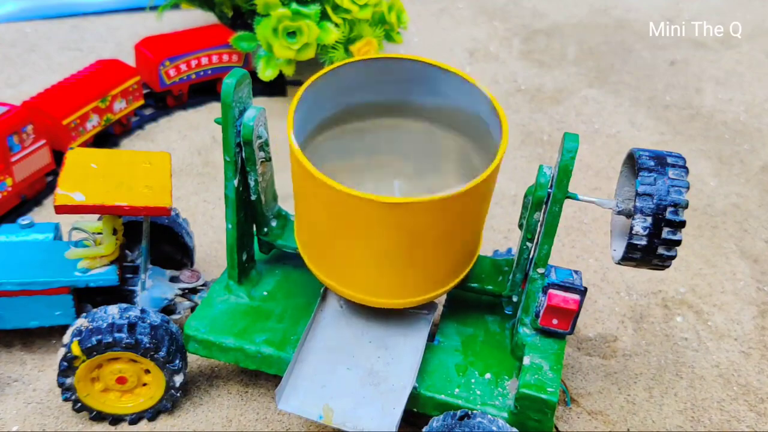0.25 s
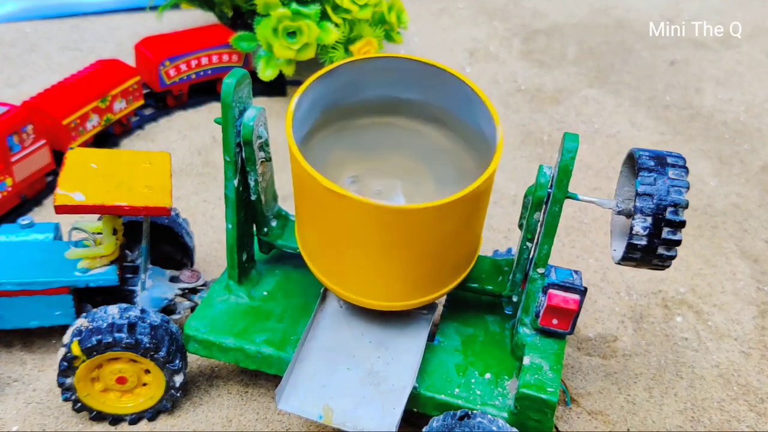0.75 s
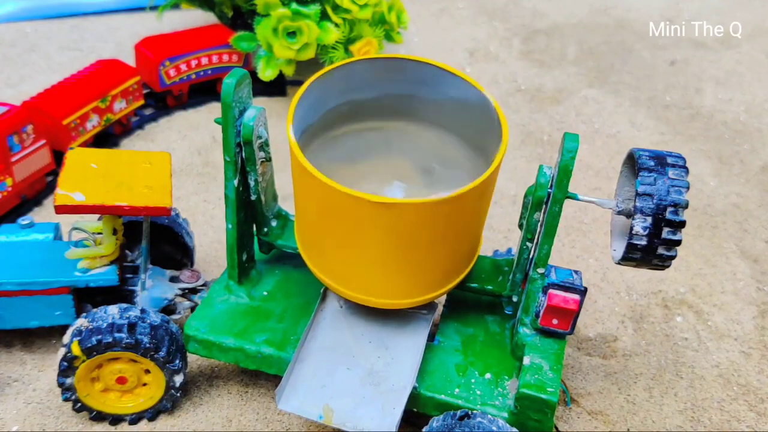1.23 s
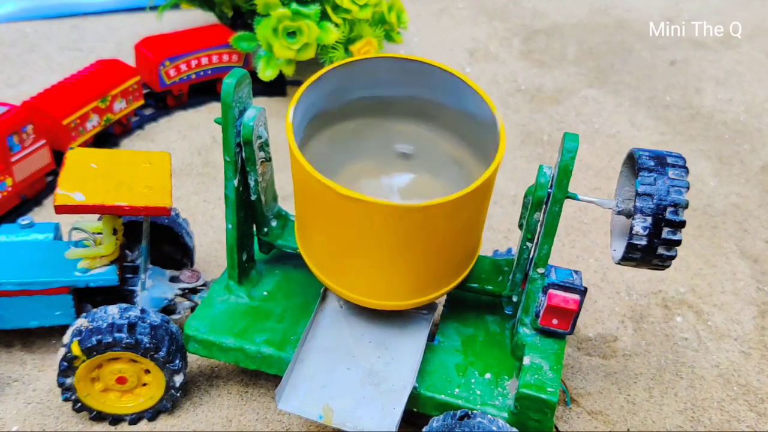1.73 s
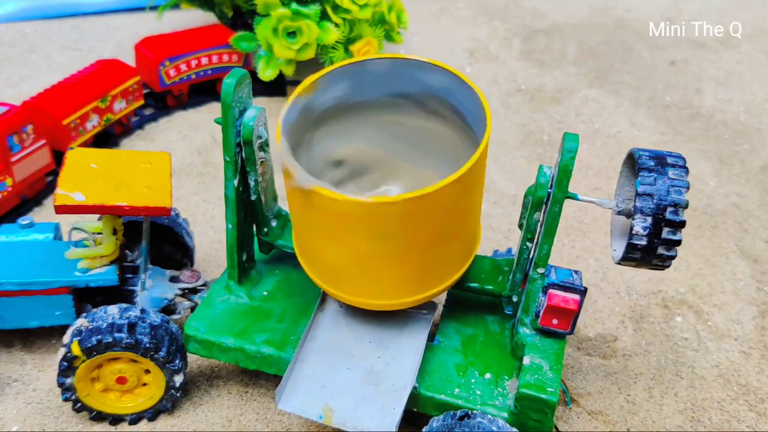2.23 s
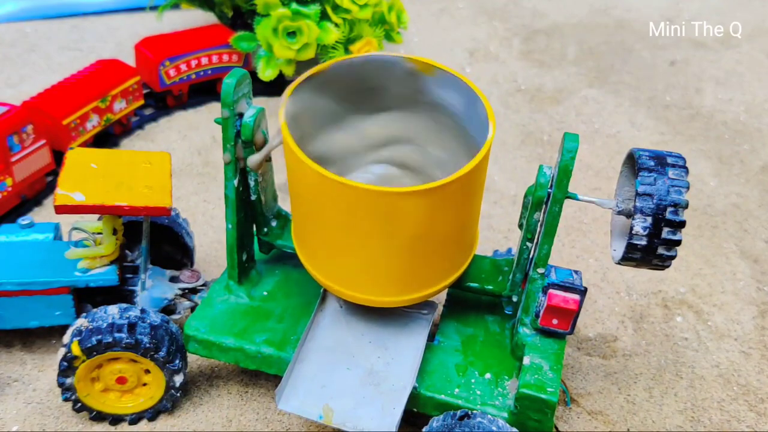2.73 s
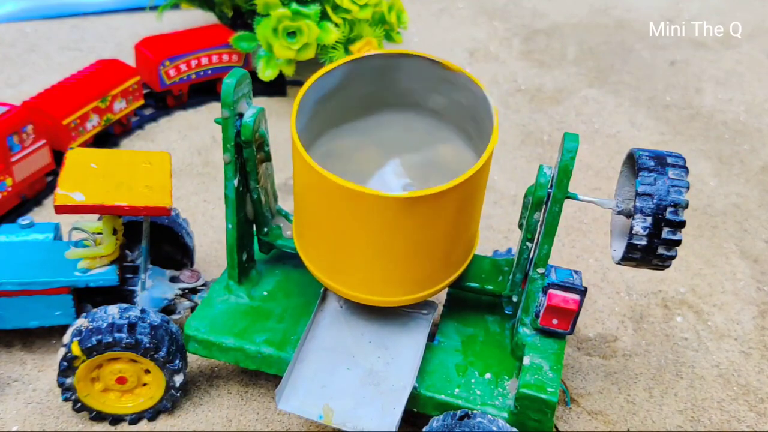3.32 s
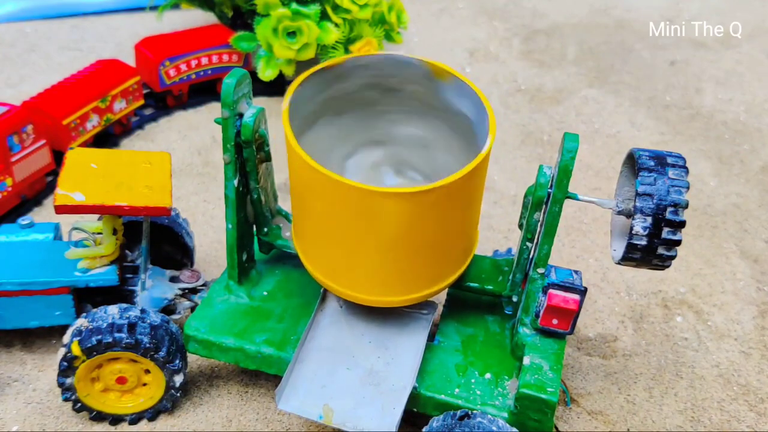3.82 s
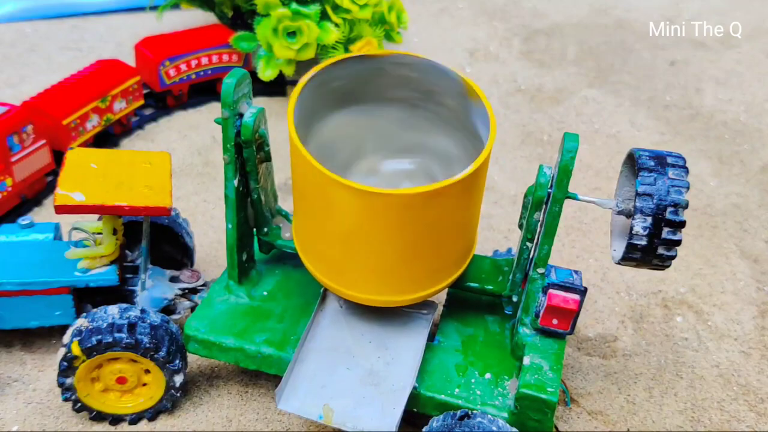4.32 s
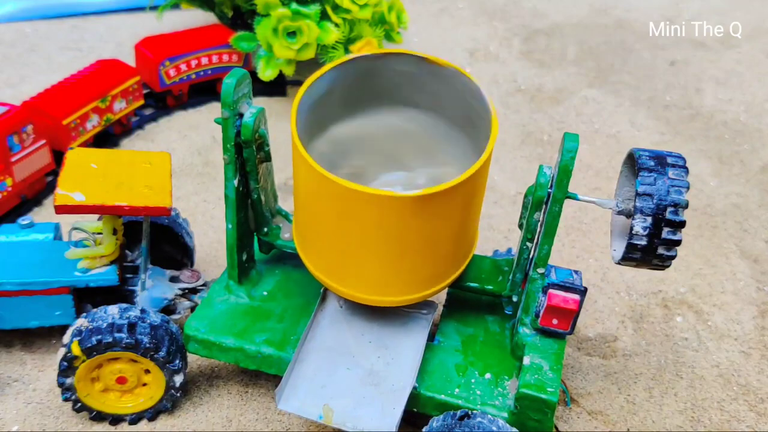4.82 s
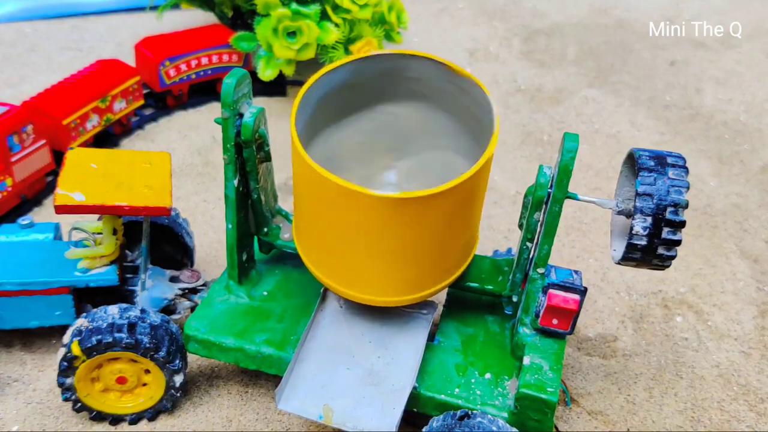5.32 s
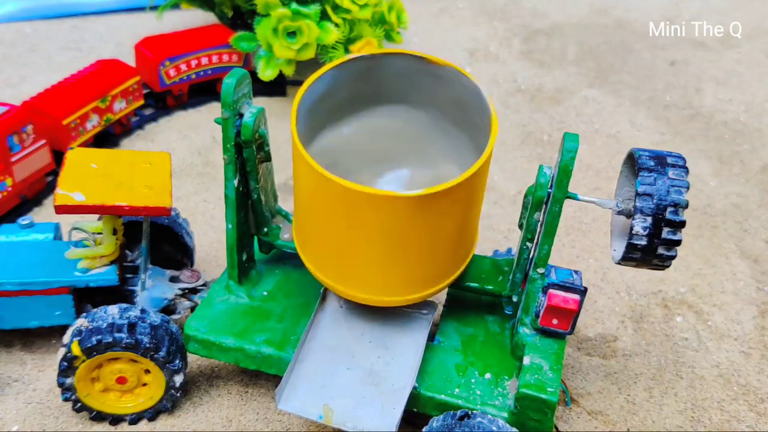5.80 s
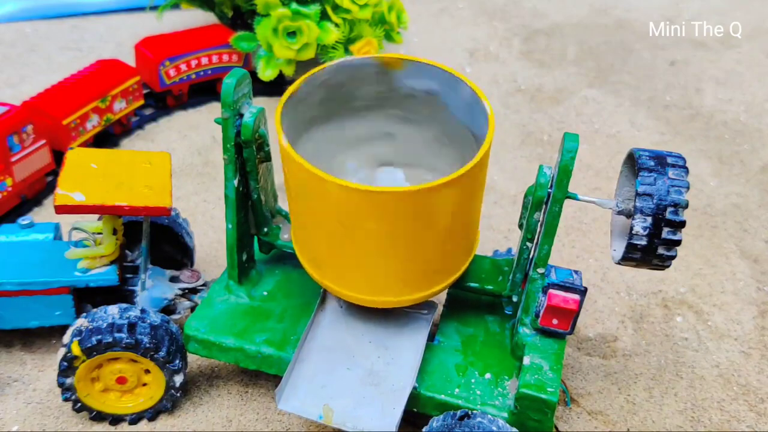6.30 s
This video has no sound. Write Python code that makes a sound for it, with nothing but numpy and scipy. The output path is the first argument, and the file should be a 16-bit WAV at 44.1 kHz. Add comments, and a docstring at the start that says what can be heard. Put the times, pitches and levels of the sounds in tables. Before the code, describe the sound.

Rapid, uneven plastic knocks and sharp metallic clicks chatter over a toy motor's low whirr, with a few faint bird peeps.

```python
"""Outdoors and close by, a small electric motor turns a toy mixer drum on a loose plastic frame.
The drum knocks in its bearings several times a second and bounces; each blow excites damped modes of
shell, bearings, shaft and frame, and loose parts chatter as random ticks. Shaped noise makes the whirr
of the gears, gliding sines make a bird's peeps, and a saturating input stage flattens the loudest knocks."""
import sys
import numpy as np
from scipy import signal
from scipy.io import wavfile
from scipy.ndimage import uniform_filter1d

SR = 44100
rng = np.random.default_rng(int(sys.argv[2]) if len(sys.argv) > 2 else 0)


def to_wav(s):
    """Save 16-bit WAV."""
    ch = np.atleast_2d(s).T  # columns
    pcm = np.round(np.clip(ch, -1, 1) * 32767)  # PCM
    wavfile.write(sys.argv[1], SR, pcm.astype(np.int16))


N = 288855

# Knocks of the drum on its shell between the drops. Each row: start in seconds, relative level in dB.
SHELL_KNOCKS = [(0.035, 4.5), (0.343, 2), (0.66, 10), (0.824, 0), (0.974, 0), (1.145, -1.5), (1.468, -1),
                (1.649, -22), (1.808, -4), (1.949, -2.5), (2.116, 6), (2.277, -3), (2.598, -6.5),
                (2.944, -4), (3.454, -8.5), (3.714, -6), (3.78, -15), (3.952, -7.5), (4.418, -20),
                (4.615, -6.5), (4.699, -10), (4.774, -11), (4.937, -8), (5.117, -12.5), (5.256, -4.5),
                (5.415, -1.5), (5.575, -8), (5.734, 3), (5.894, 2), (6.092, -13), (6.391, -9.5)]
# The hardest clacks on the shaft. Each row: start in seconds, relative strength in dB,
# relative level of the bare click in dB.
SHAFT_CLACKS = [(0.037, 4.5, -37), (0.0715, -12, -39), (0.282, 3, -26), (0.298, -10, -26), (0.344, 11, -24),
                (0.451, 5, -28), (0.5058, 3, -26), (0.545, -7, -20), (0.621, -5, -28), (0.6613, 3.5, -20),
                (0.694, -19, -28), (0.769, 6, 3), (0.823, 3.5, -26), (0.851, -12, -21), (0.927, -16, -30),
                (1.006, 4, -15), (1.017, -6, -21), (1.054, -23, -10), (1.146, -12, -28), (1.254, 6.5, -21),
                (1.345, 2, -9), (1.469, -5, -32), (1.5426, -33, -10), (1.578, -3, -30), (1.6517, -6, -32),
                (1.741, 7.5, -22), (1.8044, -3, -34), (1.832, -6, -27), (1.8935, 3, -26),
                (1.9487, -1.5, -28), (1.9634, -8, -25), (2.0668, -6, -29), (2.1162, -4, -32),
                (2.145, -4, -30), (2.2168, 8, -21), (2.277, 4.5, -24), (2.3842, -6, -22), (2.477, 0, -2),
                (2.515, -36, -11), (2.542, -5, -32), (2.621, -0.5, -35), (2.704, -5.5, -32),
                (2.726, -9, -30), (2.885, 4, -15), (2.9439, 2, -21), (3.055, 1, -29), (3.423, -4, -15),
                (3.452, -1.5, -32), (3.524, -45, -9), (3.578, -6, -47), (3.83, -23, -16),
                (3.9017, -10, -35), (4.0666, -3, -32), (4.286, -12, -32), (4.472, -5, -11), (4.57, -7, -32),
                (4.6137, -2, -22), (4.626, -18, -8), (4.727, -4.5, -41), (4.777, -6.5, -36),
                (4.791, -1, -28), (4.949, 0.5, -31), (5.0493, 3, -29), (5.208, -4, -32), (5.268, -2, -9),
                (5.371, -10, -37), (5.416, 5.5, -19), (5.517, -6, -31), (5.533, -1.5, -28),
                (5.602, -5.5, -29), (5.7339, -1, -17), (5.8335, 0, -6), (6.0088, -3, -37),
                (6.1413, -4, -26), (6.1627, -3.5, -34), (6.177, -5, -34), (6.318, -6, -31),
                (6.34, 7.5, -35), (6.489, 8, -30)]
SPREAD_DB = 3.5  # standard deviation of the force that a blow gives to each mode


def amp(db):
    """Level law: decibels become an amplitude ratio."""
    return 10 ** (np.asarray(db) / 20)


def evened(x):
    """Normalisation to unit root mean square."""
    return x / np.sqrt(np.mean(x ** 2) + 1e-20)


def filtered(x, order, hz, kind="low"):
    """Butterworth filtering: a maximally flat passband with the given edge or edges in Hz."""
    return signal.sosfilt(signal.butter(order, hz, kind, fs=SR, output="sos"), x)


def ring(x, hz, t60):
    """Damped resonance: a unit click rings one mode as a decaying sine that starts at height 1."""
    r, w = np.exp(-np.log(1000) / (t60 * SR)), 2 * np.pi * hz / SR
    return signal.lfilter([0, r * np.sin(w)], [1, -2 * r * np.cos(w), r * r], x)


def train(events, sizes, late_s=0):
    """Impulse excitation: a click of the given size at every event."""
    out = np.zeros(N)
    places = ((np.array(events)[:, 0] + late_s) * SR).astype(int)
    np.add.at(out, np.clip(places, 0, N - 1), sizes)
    return out


def fading(x, seconds):
    """Exponential relaxation: every click becomes a sudden step that dies away."""
    return signal.lfilter([1], [1, -np.exp(-1 / (seconds * SR))], x)


def shaking(events, before_s, after_s):
    """Backlash: slack is taken up shortly before a blow and the parts settle after it."""
    clicks = train(events, amp(np.array(events)[:, 1]))
    return fading(clicks, after_s) + 1.7 * fading(clicks[::-1], before_s)[::-1]


def body(events, modes, gain_db, contact_s, chatter):
    """Modal excitation: three quick touches strike every mode with its own force, low, true or high."""
    detune = .05  # loose parts sit differently at each blow, so a mode may shift by this share
    force = rng.standard_normal((len(events), len(modes)))
    when = rng.random((len(events), len(modes), 4))  # three touch delays and the choice of seat
    out = np.zeros(N)
    for k, (hz, t60, db) in enumerate(modes):
        size = amp(np.array(events)[:, 1] + gain_db + SPREAD_DB * force[:, k])
        # ticks land on any spot
        ticks = chatter * rng.standard_normal(N) * amp(SPREAD_DB * rng.standard_normal(N))
        for seat in range(3):
            here = size * ((3 * when[:, k, 3]).astype(int) == seat)
            touches = sum(train(events, here * 0.87 ** n, contact_s * (n + when[:, k, n]))
                          for n in range(3))
            ticks_here = ticks * (np.arange(N) % 3 == seat)
            seat_hz = hz * (1 + detune * (seat - 1))
            out += amp(db) * ring(touches + ticks_here, seat_hz, t60)
    return out


def load(column):
    """Slow modulation: one column of the load table as a gain over time."""
    # Load on the motor. Each row: time in seconds, whirr level in dB, rocking of the frame in dB.
    load_rows = np.array([(0, -25, -18), (.7, -30.5, -20.5), (1.5, -28.5, -22), (2.5, -30.5, -19),
                          (3.5, -25.5, -27.5), (4.5, -26.5, -20), (5.5, -28.5, -20.5), (6.55, -26, -20.5)])
    return amp(np.interp(np.arange(N) / SR, load_rows[:, 0], load_rows[:, column]))


def whirr(blows):
    """Shaped noise of gears and brushes: it flickers at random above the bass and swells round blows."""
    # Gears heard through the body. Each row: frequency in Hz, relative spectral level in dB per Hz.
    spectrum = [(12, -31), (20, -8), (58, 16), (220, -21), (1110, -39), (1510, -27), (3420, -12),
                (6710, -9), (8170, -12.5), (14700, -34), (16500, -16)]
    frames, hz = N // 128 + 5, np.fft.rfftfreq(512, 1 / SR)
    a, b, patches = rng.standard_normal((frames, 257, 3)).T
    patches = evened(uniform_filter1d(uniform_filter1d(patches, 24, 0), 4, 1))
    f, db = np.transpose(spectrum)
    colour_db = np.interp(np.log(hz + 1), np.log(f), db)[:, None]
    bins = (a + 1j * b) * amp(colour_db + 2 * patches)
    noise = evened(signal.istft(bins, nperseg=512, noverlap=384)[1][:N])
    bass = filtered(noise, 2, 170)
    middle = filtered(noise, 2, [170, 2400], "band")
    upper = filtered(noise, 2, [2400, 7800], "band")
    top = filtered(noise, 2, 7800, "high")
    flicker = amp(3 * evened(fading(fading(rng.standard_normal(N), 0.003), 0.003)))
    swell = np.minimum(shaking(blows, before_s=0.0052, after_s=0.03), .7)
    above = flicker * (1.98 * middle + upper + swell * (5 * middle + 0.67 * upper))
    treble = flicker ** 0.94 * (0.75 + 0.51 * swell) * top  # flickers slightly less
    return load(column=1) * (bass + above + treble)


def frame(weights):
    """Low-mode resonance: soft pushes make the frame boom, and rocking hums on its lowest mode."""
    # Modes of the frame. Each row: frequency in Hz, 60 dB decay time in seconds, relative level in dB.
    frame_modes = [(47.4, 0.48, -12.5), (125.7, 0.058, 1), (224, 0.039, 2), (269, 0.042, 3)]
    push_s = 0.00051  # rise of the weight coming down on the frame
    push_late_s = .002  # the weight follows the first touch
    force, out = rng.standard_normal((len(weights), len(frame_modes))), 0
    t = np.arange(800) / (push_s * SR)
    soft_push = 1.52 * t * np.exp(-t) / (push_s * SR)
    for k, (hz, t60, db) in enumerate(frame_modes):
        push = train(weights, amp(weights[:, 1] + db + SPREAD_DB * force[:, k]), push_late_s)
        out = out + ring(signal.oaconvolve(push, soft_push)[:N], hz, t60)
    hum = ring(rng.standard_normal(N), frame_modes[0][0], 0.046)
    # the swing is limited, so it wavers little
    steady = hum / np.sqrt(abs(signal.hilbert(evened(hum))) + .5)
    return out + load(column=2) * evened(steady)


def loose_parts(blows, per_s, rest_db):
    """Random impacts: small ticks of loose parts, never quite still and strongest around a blow."""
    shake = np.minimum(shaking(blows, before_s=0.001, after_s=0.0064), .6)  # play is limited
    sizes = amp(5.65 * np.minimum(rng.exponential(1, N), 4))
    return (shake + amp(rest_db)) * sizes * (rng.random(N) < per_s / SR)


def crack(ticks):
    """Contact noise: bare clicks of plastic on metal, grit of loose parts and stray thin ticks."""
    stray_db, strays_per_s = -34, 30  # lowest level before filtering, mean rate
    stray_sizes = amp(stray_db + 3.0 * np.minimum(rng.exponential(1, N), 3))
    stray = stray_sizes * (rng.random(N) < strays_per_s / SR)
    bare_clicks = np.array(SHAFT_CLACKS)[:, [0, 2]]
    clicks = amp(-6.5) * shaking(bare_clicks, before_s=0.000085, after_s=0.00078)
    edge = clicks + fading(stray + amp(-47) * ticks, 0.0021)
    return filtered(edge * rng.standard_normal(N), 2, 6500, "high")


def lift():
    """Air displacement: the drum lifts off the frame with one soft pull that ends as the knock begins."""
    lift_s, lift_db = 0.0053, -15  # length, level against the knock
    pull = -np.hanning(round(lift_s * SR))
    starts = train(SHELL_KNOCKS, amp(np.array(SHELL_KNOCKS)[:, 1] + lift_db), -lift_s)
    return signal.oaconvolve(starts, pull)[:N]


def bounced():
    """Repeated impact: drops and their uneven bounces as (s, dB) on shell, bearings, frame and shaft."""
    # The drum drops in its bearings. Each row: start in seconds, then relative levels in dB of
    # the knock on the shell, the woody tap on the bearings and the weight on the frame.
    knock_rows = [(0.126, -4, -10.5, -10.5), (0.283, 1.5, 1.5, -9.5), (0.435, -1, -11, -11),
                  (0.505, 8.5, -7.5, -19.5), (0.589, -6.5, -14, -7.5), (0.752, -4.5, -9, -15.5),
                  (0.908, -8.5, -15.5, -8.5), (1.07, -12, -20.5, -15.5), (1.237, 0.5, -9, -11),
                  (1.311, 7, -17, -23), (1.394, -9.5, -8, -15.5), (1.561, 0, -19, -7), (1.721, 5, -12, -8),
                  (1.879, -9.5, -3, -9.5), (2.037, -5.5, -7.5, -7.5), (2.2, -13, -6.5, -4),
                  (2.356, -10.5, -12.5, -10), (2.438, 2, -28, -16), (2.523, -4.5, -13.5, -9),
                  (2.69, -11, -17, -6), (2.756, -2, -17, -16), (2.866, -3, -14, -9.5),
                  (3.035, -6.5, -9.5, -8), (3.207, -5.5, -28, -18), (3.285, -3.5, -24, -10),
                  (3.382, -6, -13.5, -4), (3.547, -12.5, -21.5, -17), (3.615, -7.5, -17, -17.5),
                  (3.883, -10, -14, -15), (4.048, -8.5, -19, -13), (4.106, 0.5, -3.5, -19),
                  (4.208, -11, -22, -16), (4.268, -6.5, -12, -18.5), (4.371, -13, -24.5, -20),
                  (4.541, -9, -17.5, -13), (4.598, 0.5, -15, -40), (5.03, -6, -21.5, -4.5),
                  (5.18, -8.5, -13, -15), (5.339, -9, -19, -20), (5.501, -7.5, -13.5, -9),
                  (5.656, -8.5, -9.5, -13), (5.818, -4.5, -19, -11), (5.98, -16, -8, -10.5),
                  (6.142, -3.5, -6.5, -6), (6.302, -8, -8.5, -12.5), (6.469, -7.5, -10, -6)]
    # Bounces of each drop. Each row: delay after the drop in seconds, then levels in dB against
    # the drop for shell, tap, weight and shaft.
    bounce_rows = [(.016, -4, -16.5, -11, -22), (.032, -9, -11.5, -13, -11)]
    light_tap_db, light_weight_db = -28.5, -25  # what a shell knock passes to bearings and frame
    jitter_s, bounce_spread_db = 0.0022, 4.5  # standard deviations
    heavy_db, heavy_share = -12.5, 0.85  # drops above this weight bounce harder, those below it softer
    shaft_to_shell_db = -13  # a clack on the shaft also rings the shell
    light = [(s, db, light_tap_db, light_weight_db) for s, db in SHELL_KNOCKS]
    # a fifth column: the shaft level, from which the bounces start, equals the shell level
    drops = np.vstack([knock_rows, light])[:, [0, 1, 2, 3, 1]]
    luck = rng.standard_normal((len(drops), len(bounce_rows), 5))
    luck = luck * ([jitter_s] + 4 * [bounce_spread_db])
    extra = heavy_share * (drops[:, 3] - heavy_db)[:, None, None] * [0, 1, 1, 0, 1]
    after = (drops[:, None] + bounce_rows + extra + luck).reshape(-1, 5)
    both = np.vstack([drops, after])
    hard_clacks = np.array(SHAFT_CLACKS)[:, :2]
    knocks = np.vstack([both[:, [0, 1]], hard_clacks + [0, shaft_to_shell_db]])
    clacks = np.vstack([hard_clacks, after[:, [0, 4]]])
    return knocks, both[:, [0, 2]], both[:, [0, 3]], clacks


def drum(knocks, taps, ticks):
    """Damped contact: shell and bearings are soft plastic that dulls the treble of each touch."""
    # Modes of shell and of bearings. Each row: frequency in Hz before the shift of the seat,
    # 60 dB decay time in seconds, relative level in dB.
    shell_modes = [(325, 0.018, -7), (543, 0.014, -7), (936, 0.0097, 0), (1126, 0.039, -7.5),
                   (1196, 0.0061, -2)]
    bearing_modes = [(1960, 0.0094, 0.18), (2244, 0.0095, 0.84)]
    shell = body(knocks, shell_modes, -4.5, 0.001006, amp(-26) * ticks)
    bearings = body(taps, bearing_modes, 3.28, .0006, amp(-55) * ticks)
    return filtered(shell, 2, 2400) + filtered(bearings, 2, 3000)


def shaft(clacks, ticks):
    """Modal ringing of metal rods and screws, softened because contacts are not infinitely sharp."""
    # Modes of the shaft. Each row: frequency in Hz before the shift of the seat,
    # 60 dB decay time in seconds, relative level in dB.
    shaft_modes = [(2864, 0.0092, -4), (3400, 0.014, -1), (4130, 0.0046, 0.5), (4610, 0.008, -2.5),
                   (5920, 0.0038, -3.5), (6645, 0.0068, 2.5)]
    rods = body(clacks, shaft_modes, -10.0, 0.001, amp(-29.5) * ticks)
    return filtered(rods, 2, 8000)


def snap(taps, clacks):
    """Impact transient: a blow begins as a broad snap of noise, before any mode stands out."""
    hits = train(taps, amp(taps[:, 1] - 7.5)) + train(clacks, amp(clacks[:, 1] - 17.5))
    burst = fading(hits, 0.0004)
    return filtered(burst * rng.standard_normal(N), 1, [400, 6000], "band")


def rod():
    """Single-mode resonance: blows on the free end of a rod give a clear short ping."""
    # Blows on the rod. Each row: start in seconds, level in dB.
    pings = [(0.0492, -6), (0.4544, -1), (0.7746, 3.5), (1.9659, -2), (2.215, 2), (2.2907, -4),
             (3.0565, -5), (4.471, -1.5), (4.6279, -4), (5.8351, 4)]
    return ring(train(pings, amp(np.array(pings)[:, 1])), hz=3487, t60=0.019)


def bird():
    """Frequency modulation: short gliding whistles, slightly unsteady in pitch and level."""
    # Peeps. Each row: start in seconds, length in seconds, start and end frequency in Hz, level in dB.
    peeps = [(.075, .048, 3700, 3900, -30), (.395, .04, 4600, 3950, -29), (.71, .042, 4620, 4620, -26),
             (1.84, .065, 3500, 4600, -29), (5.785, .035, 4000, 4000, -30)]
    out = np.zeros(N)
    for s, length, hz0, hz1, db in peeps:
        hz = np.linspace(hz0, hz1, round(length * SR))
        hz = hz * (1 + .008 * evened(uniform_filter1d(rng.standard_normal(len(hz)), 150)))
        waver_db = 1.5 * evened(uniform_filter1d(rng.standard_normal(len(hz)), 150))
        envelope = amp(db + waver_db) * np.hanning(len(hz)) ** 0.12
        at = round(s * SR)
        out[at:at + len(hz)] += envelope * np.sin(2 * np.pi * np.cumsum(hz) / SR)
    return out


def scene():
    """Superposition: the same blows drive all struck parts, and the sources add up."""
    knocks, taps, weights, clacks = bounced()
    blows = np.vstack([knocks, clacks])
    ticks = loose_parts(blows, per_s=600, rest_db=-16)
    more = loose_parts(blows, per_s=600, rest_db=-16)
    machine = whirr(blows) + frame(weights) + crack(more) + lift()
    struck = drum(knocks, taps, ticks) + shaft(clacks, ticks + more) + snap(taps, clacks) + rod()
    return (machine + struck + bird())[None]


def record(dry):
    """Saturation: the input flattens loud knocks; a coupling capacitor and the band limit follow."""
    ceiling, edge_hz = .73, 15650  # level that clipping approaches, band limit
    clipped = dry / (1 + abs(dry / ceiling) ** 5) ** (1 / 5)
    coupled = filtered(clipped, 1, 14, "high")
    band_limit = signal.firwin(255, edge_hz, window=("kaiser", 9), fs=SR)
    return signal.oaconvolve(coupled, band_limit[None], "same")


dry = scene()
out = record(dry)
to_wav(out)
```